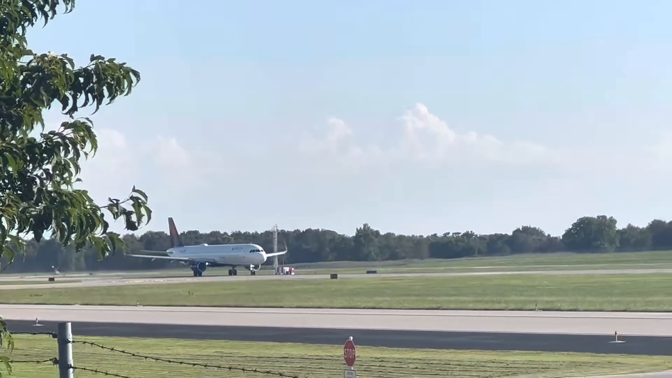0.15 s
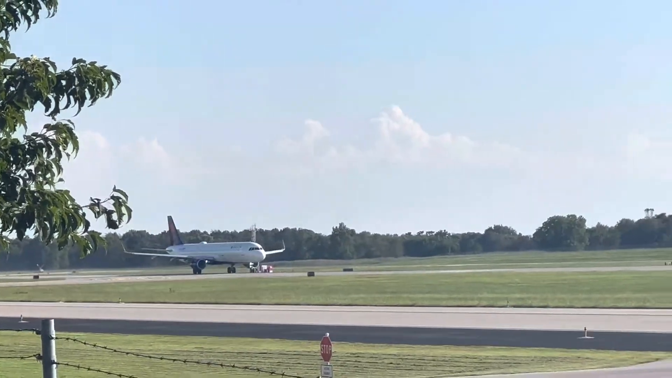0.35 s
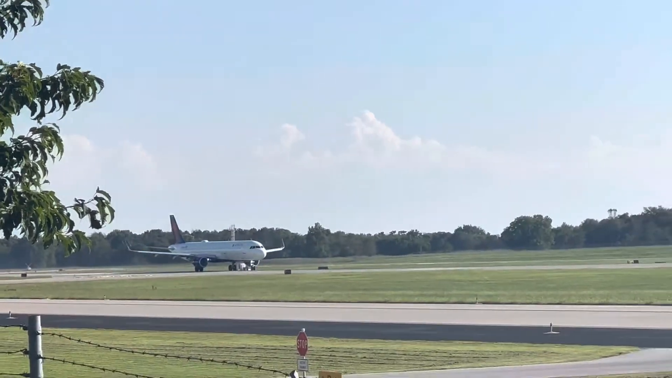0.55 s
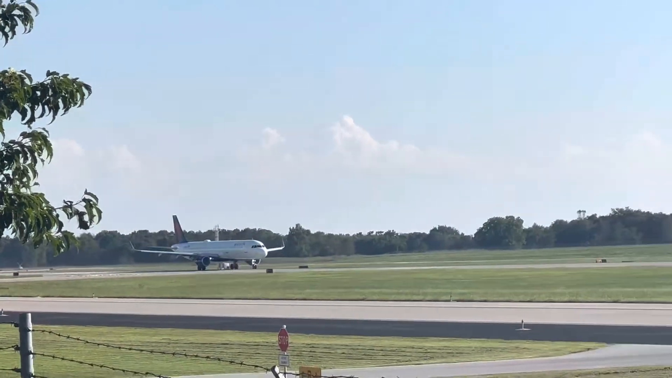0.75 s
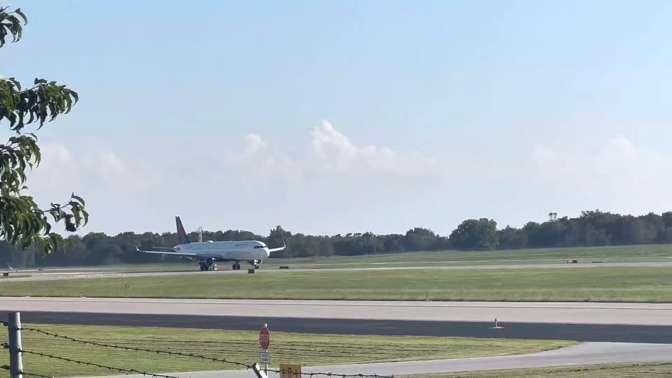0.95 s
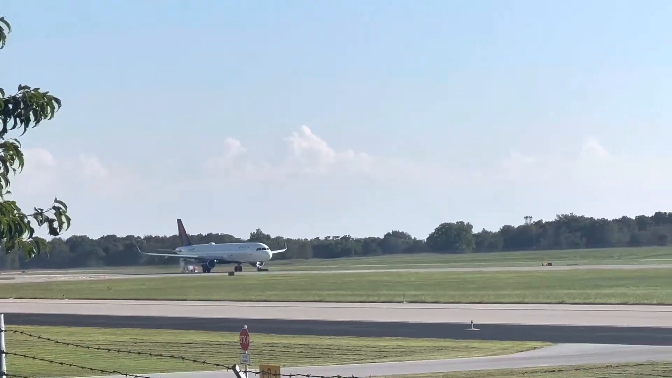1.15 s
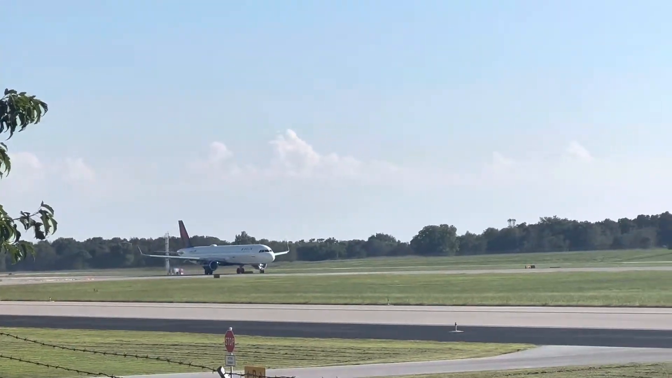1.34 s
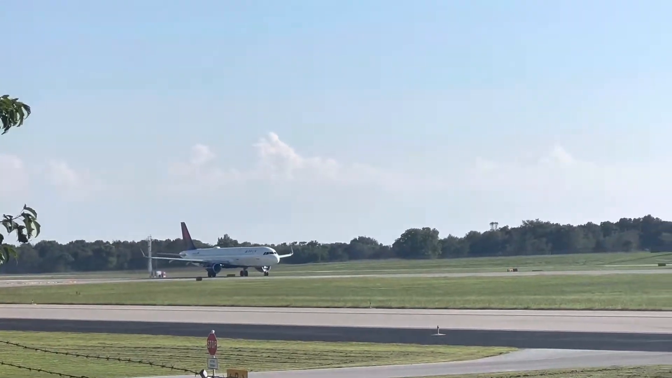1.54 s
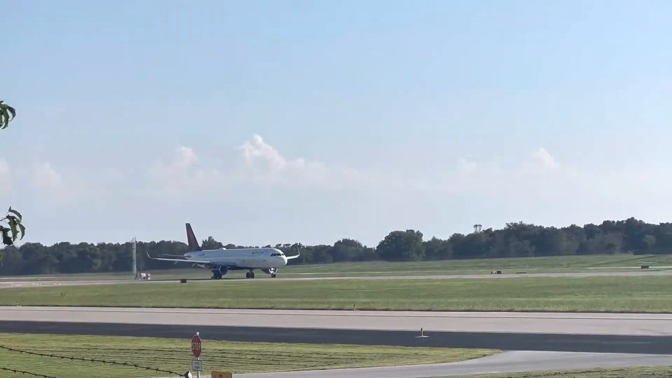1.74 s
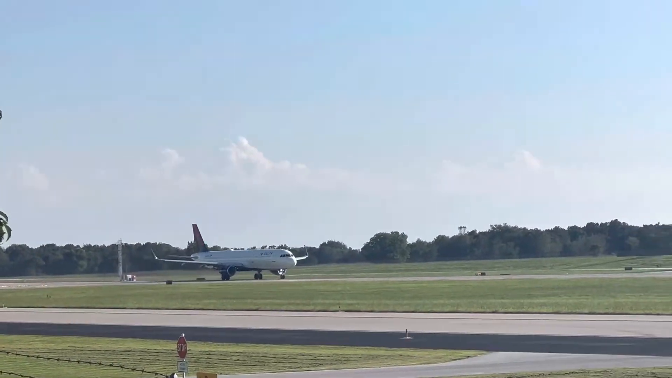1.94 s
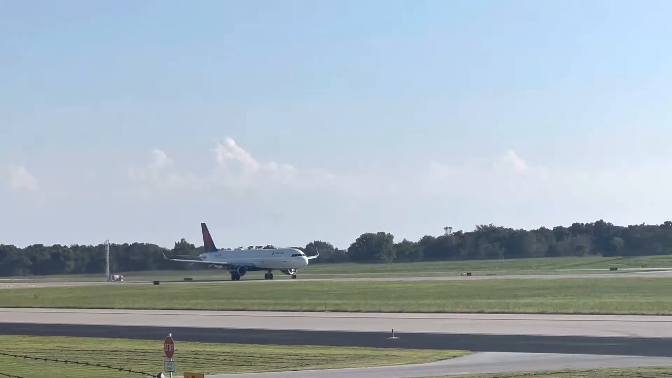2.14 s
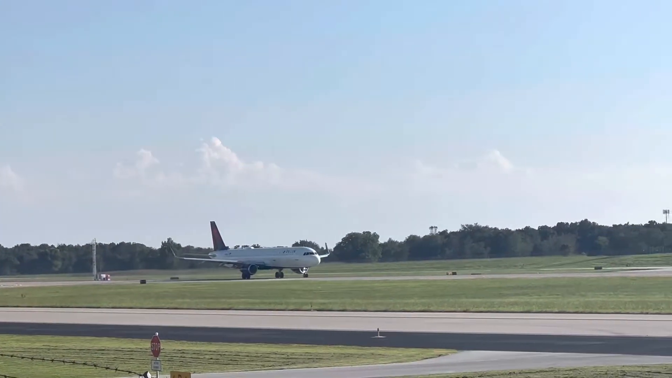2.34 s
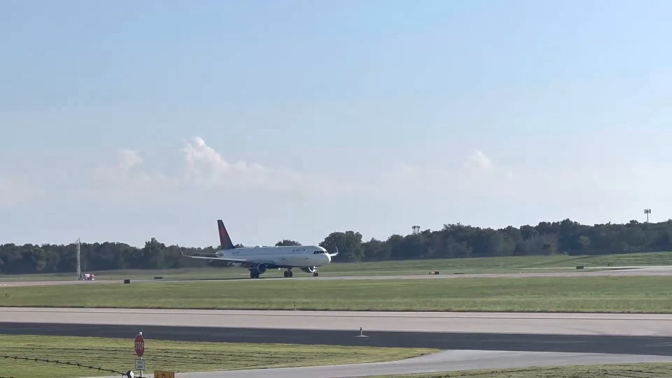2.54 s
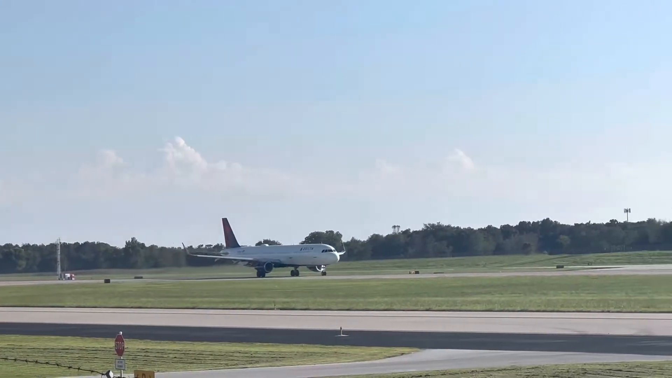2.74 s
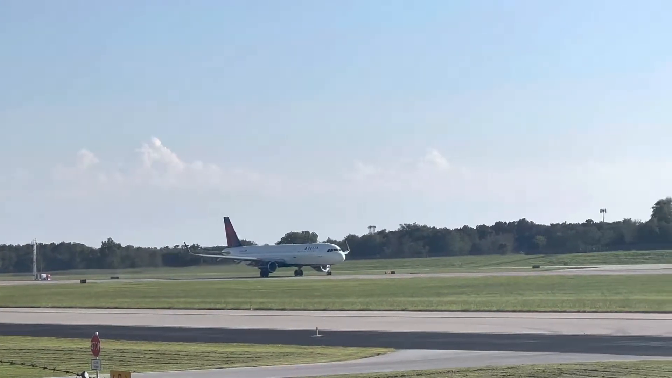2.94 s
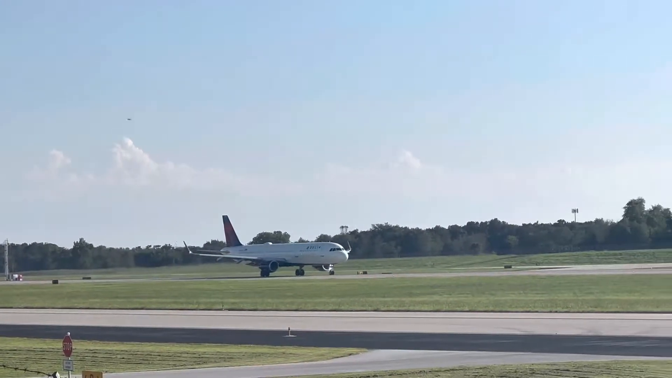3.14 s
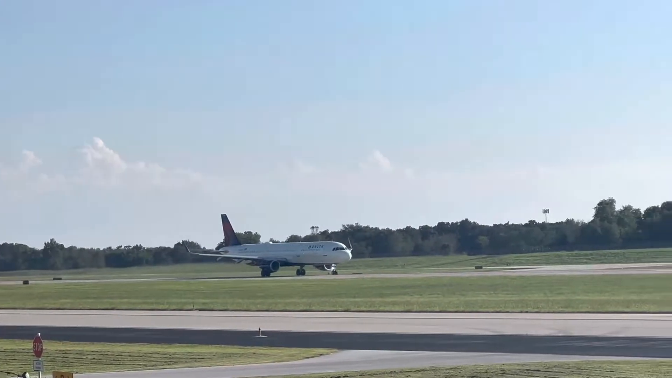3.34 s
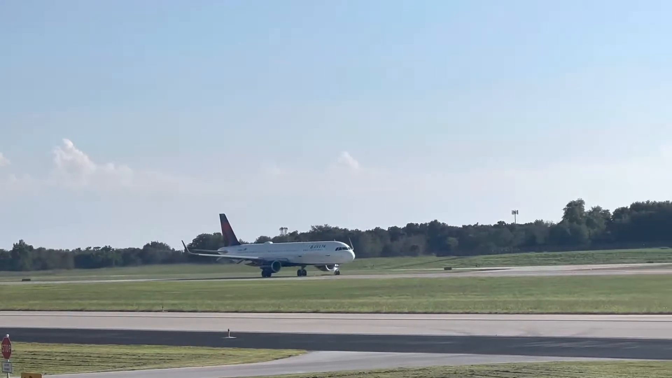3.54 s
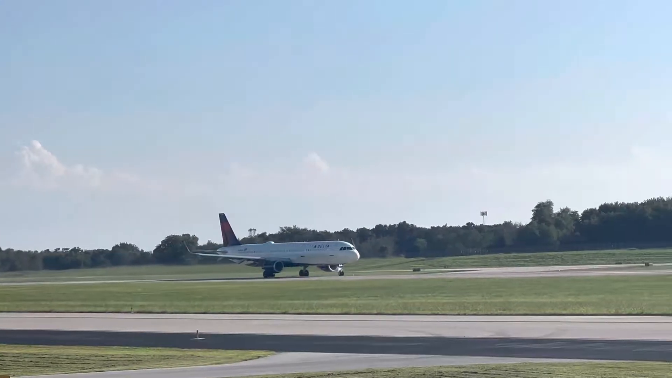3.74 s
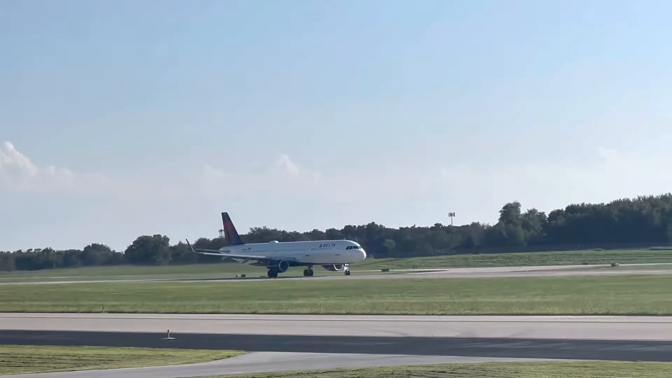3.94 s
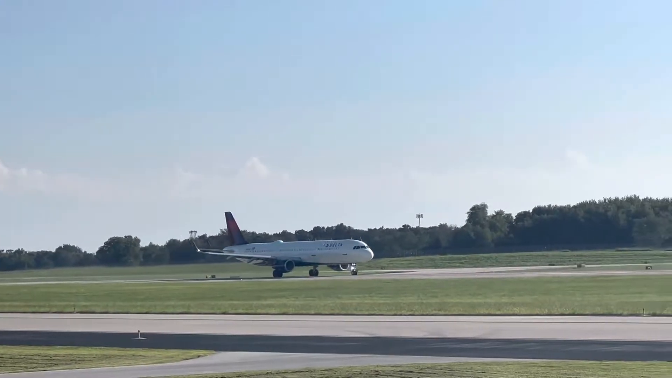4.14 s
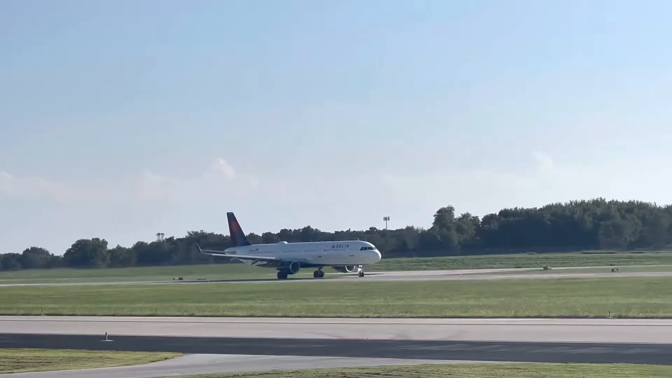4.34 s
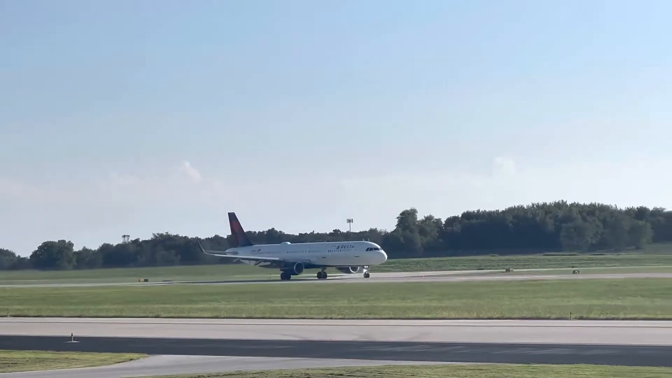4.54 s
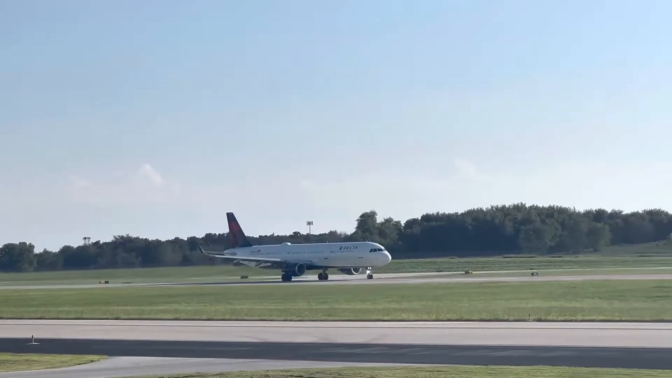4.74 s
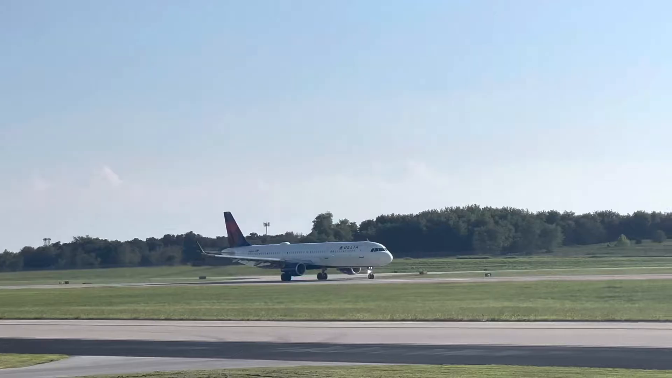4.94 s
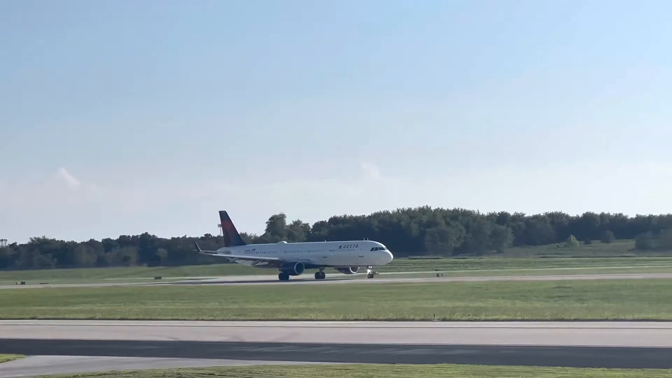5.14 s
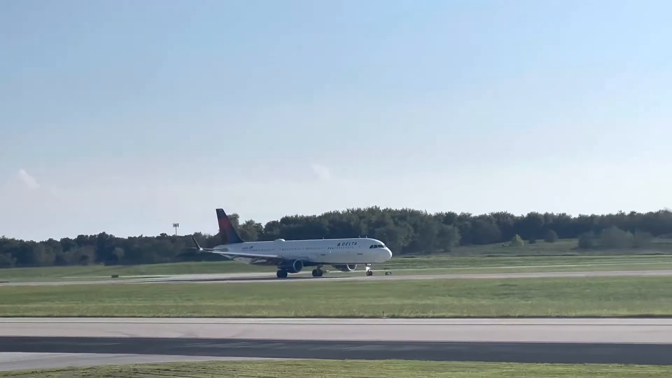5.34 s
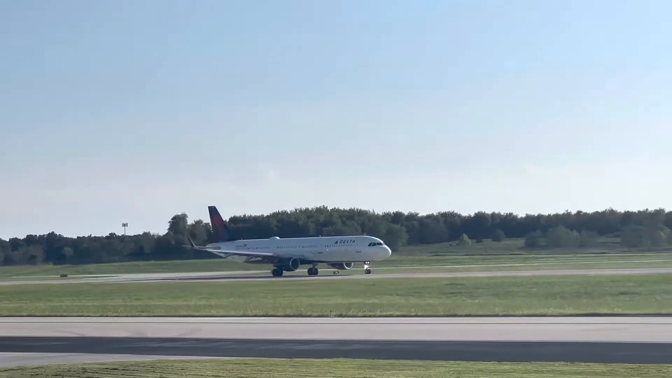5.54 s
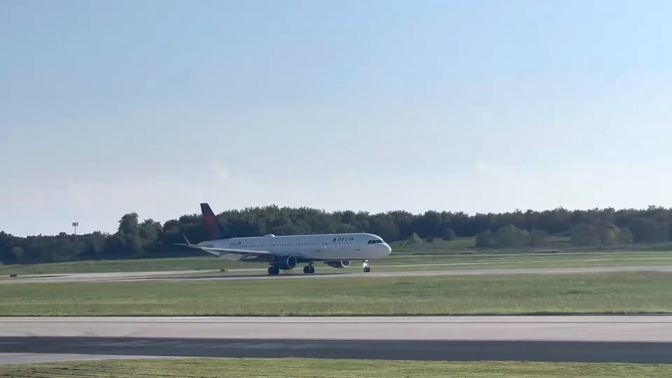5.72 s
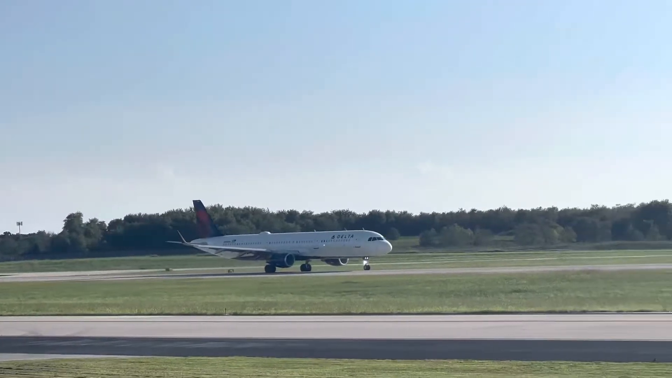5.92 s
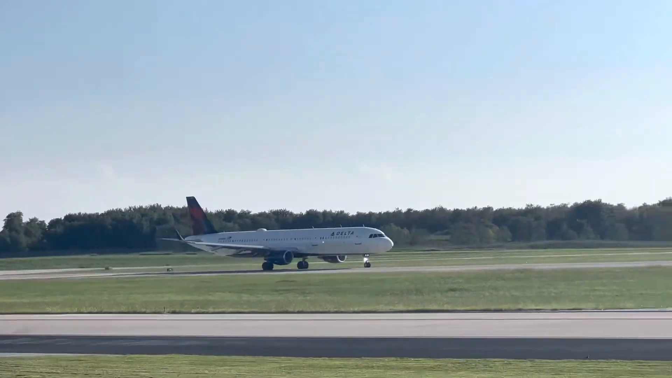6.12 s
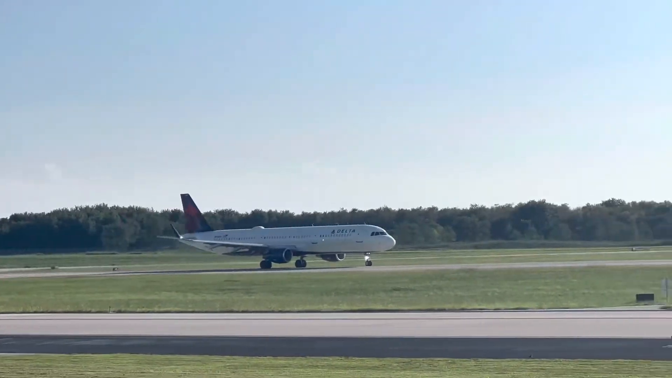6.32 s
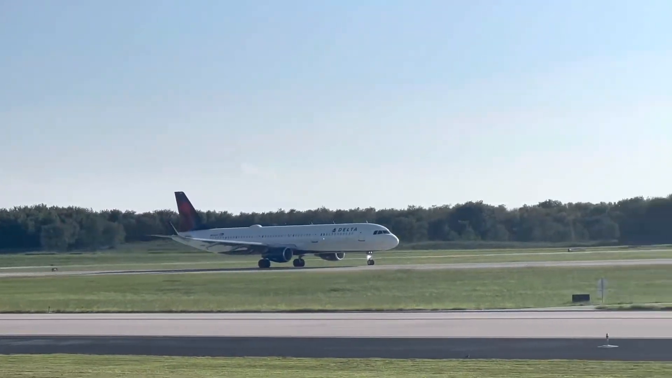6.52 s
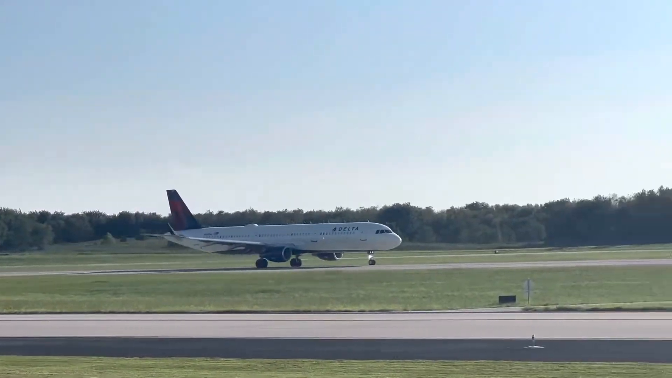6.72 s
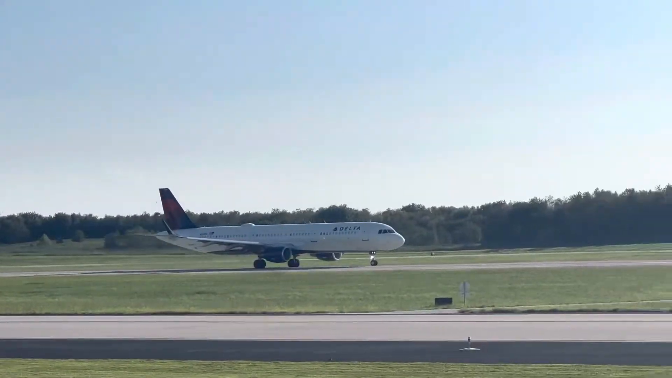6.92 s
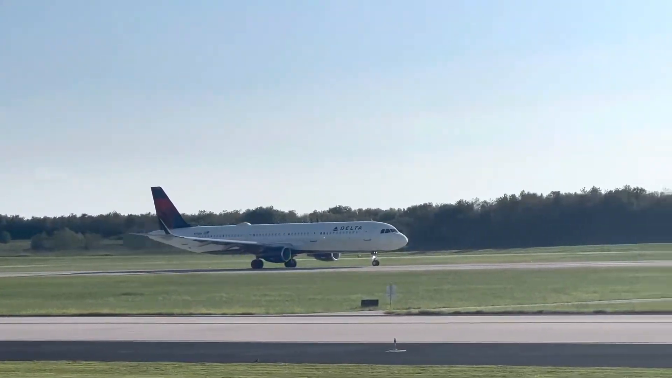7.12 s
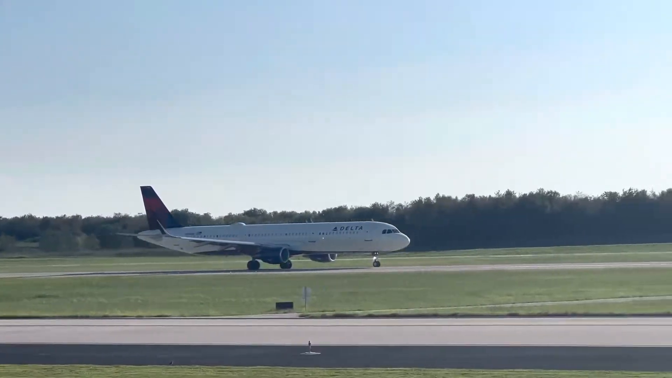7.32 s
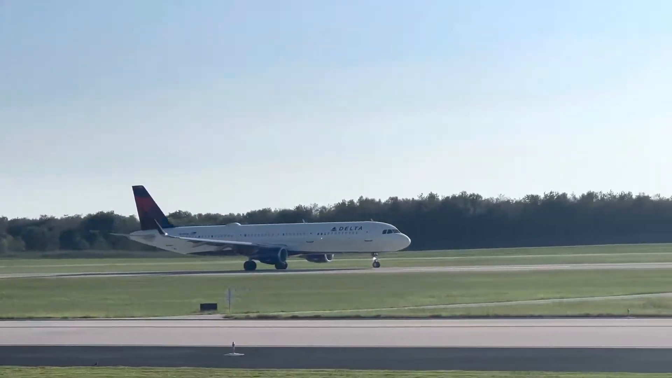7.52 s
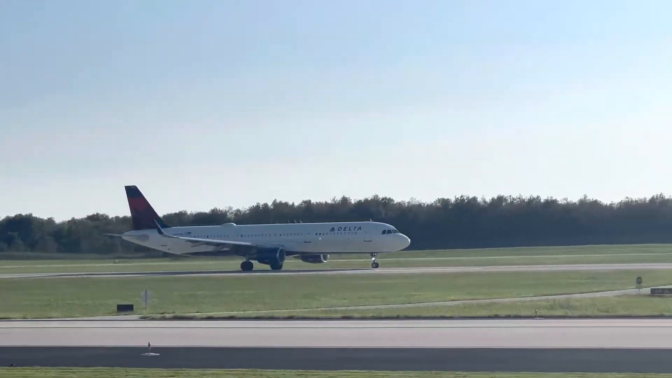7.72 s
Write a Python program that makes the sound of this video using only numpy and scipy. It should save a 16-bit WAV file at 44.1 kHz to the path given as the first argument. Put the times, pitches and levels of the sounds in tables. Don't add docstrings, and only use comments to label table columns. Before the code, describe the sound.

Insects rasp in short phrases with one dry tick near two seconds, while a far idling turbine whistles and flutters on the breeze. Beneath them jet rumble gradually builds. After five seconds the roar strengthens, and near six and a half it bursts forward with a fluttering high whine, peaking around seven before softening. Open field, small stereo microphone, slightly uneven left and right.

```python
import sys
import numpy as np
from scipy import signal
from scipy.fft import rfft, irfft, next_fast_len
from scipy.io import wavfile
from scipy.ndimage import uniform_filter1d

SR = 44100
rng = np.random.default_rng(int(sys.argv[2]) if len(sys.argv) > 2 else 0)


def store_pcm(level_fs):
    pcm = np.round(np.clip(level_fs, -1, 1) * 32767).astype(np.int16)
    wavfile.write(sys.argv[1], SR, np.atleast_2d(pcm).T)


def field_ratio(decibels):
    return 10 ** (np.asarray(decibels, dtype=float) / 20)


N = 342657
T_S = np.arange(N) / SR
HZ = np.fft.rfftfreq(2048, 1 / SR)[:, None]
FRAME_S = np.arange(N // 512 + 6) * 512 / SR

# (time [s], roar [dB], fan tone [dB])
JET = [(0, -40, -56.5), (1.3, -37, -55), (2.3, -36.5, -56), (3.8, -34.5, -49), (4.5, -33.5, -51),
       (5.15, -32, -45), (5.5, -28, -41.5), (5.75, -27.5, -42), (6.1, -27.5, -39), (6.3, -27.5, -33.5),
       (6.55, -21.5, -27.5), (6.65, -18, -19.5), (6.9, -16, -21), (7.1, -17, -27), (7.3, -19.5, -29),
       (7.77, -21.5, -27)]
# (frequency [Hz], left lead [rad])
NEAR_PORTS = [
    [(60, 0.83), (95, 0.71), (150, 1), (240, 0.9), (370, 0.97), (580, 0.84), (920, 0.67), (1450, 0.58), (2290, 0.94), (3610, 1), (5700, 0.84), (8980, 0.81)],
    [(60, 2), (95, 3), (150, -7), (240, -0.5), (370, 0.5), (580, 3), (920, 4), (1450, 9), (2290, -1.5), (3610, -1), (5700, 3), (8980, -4.5)],
    [(0, -0.12), (600, 0.34), (1290, -0.013), (1640, -0.71), (2150, -0.61), (2760, -0.085), (3010, 0.86), (3450, 0.83), (4740, 0.25), (8870, 0.0), (9130, -1.1)],
]
FAR_PORTS = [
    [(60, 1), (95, 1), (150, 0.91), (240, 0.95), (370, 0.87), (580, 0.58), (920, 0.27), (1450, 0.24), (2290, 0.97), (3610, 0.99), (5700, 1), (8980, 0.3)],
    [(60, 1), (100, -0.5), (180, 0.5), (320, 1.5), (560, -1.5), (970, -7), (1690, -1.5), (2950, -1), (5150, -4.5), (8980, 0.5)],
    [(0, -1.1), (520, 0.21), (780, 3.5), (1290, -0.75), (1720, -0.5), (2240, -1), (3190, 1.6), (4740, 1.1), (8790, 0.3), (9130, -3)],
]


def evened(x):
    return x / np.sqrt(np.mean(x ** 2) + 1e-20)


def read(points, hz):
    f, value = np.transpose(points)
    return np.interp(np.log(hz + 1), np.log(f + 1), value)


def columns(rows, t):
    s, *rest = np.transpose(rows)
    return [np.interp(t, s, c) for c in rest]


def bumps(rows, t, length_s):
    grid = np.arange(0, t[-1], .002)
    total_db = sum(db * np.exp(-((grid - s) / length_s) ** 2) for s, db in rows)
    return np.interp(t, grid, total_db)


def band(x, hz, width_hz):
    edges_hz = [hz - width_hz / 2, hz + width_hz / 2]
    return signal.sosfilt(signal.butter(2, edges_hz, "bandpass", fs=SR, output="sos"), x)


def tone(hz):
    return np.exp(2j * np.pi * hz * T_S)


def drift(hz):
    z = rng.standard_normal((N // 64 + 2, 2)) @ [1, 1j]
    z = signal.sosfilt(signal.butter(2, hz, fs=SR / 64, output="sos"), z)
    z = np.interp(np.arange(N) / 64, np.arange(len(z)), z)
    return z / np.sqrt(np.mean(abs(z) ** 2))


def unit(spectrum):
    db = read(spectrum, HZ)
    return db - 10 * np.log10(np.sum(field_ratio(db) ** 2)) - 4


def wash(field_db, ports, patchy_db):
    a, b, c, d, patches = rng.standard_normal((len(FRAME_S), len(HZ), 5)).T
    patches = uniform_filter1d(patches, size=20, axis=0)
    patches = evened(uniform_filter1d(patches, size=10, axis=1))
    same, lean_db, lead_rad = (read(p, HZ) for p in ports)
    same = np.clip(same, 0, 1)
    left = a + 1j * b
    right = same * left * np.exp(-1j * lead_rad) + np.sqrt(1 - same ** 2) * (c + 1j * d)
    z = np.array([left * field_ratio(lean_db / 2), right * field_ratio(-lean_db / 2)])
    z = z * field_ratio(field_db + patchy_db * patches)
    return signal.istft(z, nperseg=2048, noverlap=1536)[1][:, :N]


def focus():
    # (time [s], length [s], centre [Hz], width [octaves], lift [dB])
    patches = [(0.7, 0.38, 510, 0.32, 3), (1.3, 0.47, 380, 0.15, 5), (2.67, 0.13, 203, 0.53, 5),
               (4.25, 0.3, 414, 0.14, 6), (7.5, 0.15, 930, .3, 2.5), (4.93, 0.045, 290, 0.4, 11.5),
               (6.4, 0.078, 450, 0.75, 4), (5.75, 0.096, 1190, 0.16, 9.5), (5.8, 0.39, 340, 0.35, 5.5),
               (5.66, 0.45, 750, 0.35, -3.5), (6.95, 0.17, 690, 0.5, 3.5), (7.7, 0.064, 620, 0.29, 7.5),
               (6.35, 0.22, 150, .3, 5.5), (1.4, 0.27, 1400, .8, 1), (4.02, 0.34, 3100, .6, 2.5),
               (6.0, .1, 3200, 0.74, 0), (3.25, 0.36, 390, 0.61, -3.5), (7.1, 0.16, 4600, .4, 1.5),
               (5.5, 0.059, 1250, .3, 4), (3.75, .15, 100, .5, 2), (7.08, 0.045, 78, .8, 3.5)]
    return sum(db * np.exp(-((FRAME_S - s) / length_s) ** 2 - (np.log2((HZ + 1) / hz) / octaves) ** 2)
               for s, length_s, hz, octaves, db in patches)


def air():
    # (time [s], level [dB])
    hiss_level = [(0, -84), (2.6, -83.5), (3.8, -87), (5, -91), (6.3, -93), (6.6, -110), (7.77, -100)]
    # (centre [Hz], width [Hz], level [dB])
    hiss_bands = [
        (11080, 1000, 0.5),
        (12600, 930, -8),
        (14800, 630, -12),
    ]
    noise = rng.standard_normal((2, N))
    hiss = sum(field_ratio(db) * evened(band(band(noise, hz, width_hz), hz, width_hz))
               for hz, width_hz, db in hiss_bands)
    hiss = hiss + 0.064 * hiss[::-1]
    line = field_ratio(-89.0) * tone(13740).imag * abs(drift(3)) * [[1], [-1]]
    return field_ratio(columns(hiss_level, T_S)[0]) * hiss + line


def distant_wash():
    # (frequency [Hz], density [dB per Hz])
    spectrum = [(90, -34), (150, -15), (305, -18.5), (530, -16.5), (820, -20), (1100, -30.5), (2480, -34),
                (3280, -39.5), (4180, -48), (5600, -42.5), (6440, -59), (8070, -53), (9700, -55.5),
                (9950, -83), (20000, -120)]
    return wash(unit(spectrum) - 34 + focus(), FAR_PORTS, patchy_db=2.5)


def strokes(per_s, sharp):
    return (.5 - .5 * np.cos(2 * np.pi * np.cumsum(per_s) / SR)) ** sharp


def katydids(scrape):
    # (start [s], slowing [s], end [s], pitch [Hz], level [dB])
    phrases = [(-.1, .08, .243, 7500, -66), (.3, .43, .57, 7950, -74), (.85, 1.1, 1.3, 7520, -65),
               (1.2, 1.28, 1.34, 7950, -75), (1.85, 2.0, 2.12, 7950, -71), (2.45, 2.73, 2.895, 7500, -66),
               (2.8, 2.88, 2.98, 8000, -74), (3.4, 3.66, 3.815, 7500, -66), (4.3, 4.43, 4.56, 7900, -71),
               (4.7, 4.84, 4.98, 7550, -68), (5.6, 5.76, 5.92, 7500, -69), (5.95, 6.02, 6.12, 7950, -71)]
    out = np.zeros(N)
    for start_s, slowing_s, end_s, hz, db in phrases:
        at = np.arange(max(round(start_s * SR), 0), round(end_s * SR))
        t = at / SR
        slow = t > slowing_s
        swell = ((t - start_s) / (end_s - start_s)) ** .5 * np.where(slow, 1, field_ratio(-7))
        beat = np.sin(np.pi * np.where(slow, 51 * (end_s - t), 95 * t)) ** 4
        out[at] += field_ratio(db) * swell * beat * np.sin(2 * np.pi * hz * t) * (.9 + .5 * scrape[at])
    return field_ratio(9.5) * out


def high_rasps(noise):
    # (time [s], level [dB])
    rasp_events = [(.48, -76), (1.1, -72), (1.385, -74), (1.945, -76), (2.155, -75), (2.755, -76),
                   (3.02, -75), (3.39, -75), (3.595, -75), (3.82, -75), (4.025, -74), (4.27, -75),
                   (4.48, -75), (4.84, -75), (5.16, -76), (5.4, -77), (5.75, -77)]
    rasp_hz, rasp_s = 9400, .055
    envelope = np.zeros(N)
    for s, db in rasp_events:
        envelope += field_ratio(db) * np.clip(1.5 - 3 * abs(T_S - s) / rasp_s, 0, 1)
    scrape = evened(band(band(noise, rasp_hz, 450), rasp_hz, 450))
    return envelope * scrape * strokes(np.full(N, 110.), 1.5)


def dry_tick(noise):
    # (time [s], level [dB])
    ticks = [
        (1.8777, -49),
    ]
    tick_hz, width_hz = 8100, 2400
    out = np.zeros(N)
    for s, db in ticks:
        snap = noise * np.exp(-np.maximum(T_S - s, 0) / .002) * (T_S > s)
        out += field_ratio(db + 7) * band(band(snap, tick_hz, width_hz), tick_hz, width_hz)
    return out


def insects():
    noise = rng.standard_normal(N)
    near = katydids(evened(band(noise, 250, 400))) + dry_tick(noise)
    chorus = evened(band(noise[::-1], 8420, 300))
    chorus = chorus * strokes(48 + 5 * drift(3).real, 1.5) * abs(drift(2.5))
    return near + field_ratio(-77) * chorus + field_ratio([[5], [-1]]) * high_rasps(noise)


def idler():
    # (time [s], level [dB])
    whine_level = [(0, -67), (1.1, -69.5), (1.25, -59.5), (2.3, -57), (2.95, -52), (3.3, -58.5),
                   (3.95, -53.5), (4.65, -59.5), (4.8, -67.5), (5.45, -60.5), (5.65, -71.5), (6.4, -77)]
    # (time [s], level [dB])
    gaps = [
        (.3, -14),
        (1.02, -11),
        (1.55, -14),
        (2.24, -3),
    ]
    db = columns(whine_level, T_S)[0] + bumps(gaps, T_S, length_s=0.076)
    turn = tone(5550.5)
    whine = np.sqrt(2) * field_ratio(db) * (turn * (1.04 + 0.22 * drift(8)) + field_ratio(-39) * turn ** 2).real
    haze_db = uniform_filter1d(db, size=20000) - 7.5
    haze = field_ratio(haze_db) * evened(band(rng.standard_normal(N), 5200, 1300))
    sides = np.array([[field_ratio(-60)], [field_ratio(-56) * np.exp(-1.8j)]])
    hum = tone(824) * (.8 + .4 * drift(3)) * sides
    return whine + haze + np.sqrt(2) * hum.real


def fan():
    # (time [s], blade passing [Hz])
    passing = [(0.0, 3338), (1.2, 3365), (3.0, 3407), (4.2, 3421), (4.8, 3425), (5.7, 3441), (6.3, 3417),
               (6.9, 3410), (7.77, 3358)]
    # (time [s], level [dB])
    tone_eddies = [(.5, 8.5), (.74, 4), (1.15, 9.5), (1.42, -15), (1.56, 8), (2.4, 11.5), (2.72, 7),
                   (2.0, 4), (3.12, 7), (3.9, 2), (5.3, 5), (5.6, 6), (5.76, 4), (5.88, -12), (5.97, 8),
                   (6.32, 1.5), (6.4, -6), (6.5, 3.5), (6.56, -4.5), (6.79, -7), (6.85, 2), (6.95, -7),
                   (7.05, -9), (7.11, 6), (7.27, -7.5), (7.4, 3), (7.52, -13), (7.6, 0), (7.7, -19)]
    overtone_glints = [(6.6, 7), (6.76, 3), (6.86, 4), (6.94, -6), (7.0, 8), (7.07, 9), (7.15, 21.5),
                       (7.25, 8), (7.58, 11)]
    hz, beam_db = columns(passing, T_S)[0], columns(JET, T_S)[1]
    tone_db = beam_db + bumps(tone_eddies, T_S, length_s=0.025)
    overtone_db = -47 + 1.3 * (beam_db + 19.5) + bumps(overtone_glints, T_S, length_s=.03)
    scatter = np.clip(.4 - .01 * (beam_db + 20), 0, .75)
    turn = np.exp(2j * np.pi * np.cumsum(hz + 5 * drift(9).real) / SR)
    near = field_ratio(tone_db) * turn * (np.sqrt(1 - scatter ** 2) + scatter * drift(13))
    overtone = field_ratio(overtone_db) * turn ** 2 * (.85 + .55 * drift(30))
    far_db = np.minimum(beam_db, -44) - 7
    far_turn = np.exp(2j * np.pi * .986 * np.cumsum(hz) / SR)
    far = field_ratio(far_db) * far_turn * drift(20)
    lead = np.exp(.35j * np.array([[1], [-1]]))
    return np.sqrt(2) * (((near + far) * lead).real + overtone.real)


def exhaust_rumble():
    # (frequency [Hz], density [dB per Hz])
    spectrum = [(15, -52), (25, -30), (32, -22), (40, -14), (52, -5.5), (70, 1), (100, 0.5), (125, -1.5),
                (160, -8.5), (200, -19.5), (260, -24), (340, -33), (570, -120)]
    # (time [s], level [dB])
    surges = [
        (1.6, 0.5),
        (2.2, -1.5),
        (2.9, 0.5),
        (3.15, -2),
        (3.9, 1),
        (4.7, -3.5),
        (5.0, 1),
        (5.54, -1.5),
    ]
    away_s = FRAME_S - 5.7
    level_db = -16.5 + np.minimum(1.35 * away_s, -1.65 * away_s)
    level_db = level_db + bumps(surges, FRAME_S, length_s=.15)
    return wash(unit(spectrum) + level_db + 6.5 + focus(), FAR_PORTS, patchy_db=-0.4)


def exhaust_roar():
    # (frequency [Hz], density [dB per Hz])
    spectrum = [(88, -27.5), (150, -11.5), (235, -10), (369, -6), (560, -9.5), (1220, -14.5), (1610, -18.5),
                (1850, -17), (3170, -17.5), (3450, -14.5), (3700, -22), (5150, -27.5), (5700, -32.5),
                (6330, -33), (7020, -36.5), (8650, -51.5), (9430, -74), (12300, -110), (20700, -120)]
    roar_db = columns(JET, FRAME_S)[0]
    shadow_db = np.maximum(-17 - roar_db, 0)
    loss_db_per_khz = .35 + 0.17 * np.maximum(shadow_db - 7, 0)
    loss_db_per_khz = loss_db_per_khz + .12 * (N / SR - FRAME_S)
    lift_db = -6.5 + 0.3742 * shadow_db
    low = 1 / (1 + (HZ / 600) ** 2)
    dull_db = -loss_db_per_khz * np.maximum(HZ - 1500, 0) / 1000 + lift_db * low
    return wash(unit(spectrum) + roar_db + 4.5 + dull_db + focus(), NEAR_PORTS, patchy_db=-0.2)


def scene():
    background = air() + distant_wash() + insects() + idler()
    return background + fan() + exhaust_rumble() + exhaust_roar()


def roll_off(x):
    return signal.sosfilt(signal.butter(12, 15100, fs=SR, output="sos"), x)


def record(dry):
    # (frequency [Hz], side level [dB])
    width = [(60, -4), (200, -2), (300, 0), (1900, 0), (2150, -4), (2550, -4), (2800, 0), (4200, 0),
             (5000, -18), (8800, -18), (9000, 0)]
    left, right = signal.sosfilt(signal.butter(3, 36, "highpass", fs=SR, output="sos"), dry)
    mid, side = (left + right) / 2, (left - right) / 2
    size = next_fast_len(N)
    side_gain = field_ratio(read(width, np.fft.rfftfreq(size, 1 / SR)))
    side = irfft(rfft(side, size) * side_gain, size)[:N]
    fade = signal.windows.tukey(N, 600 / N)
    return roll_off(np.array([mid + side, mid - side]) * fade)


dry = scene()
out = record(dry)
store_pcm(out)
```